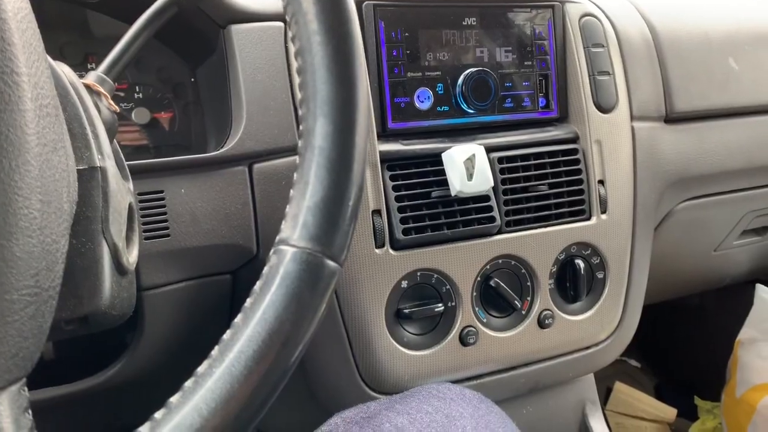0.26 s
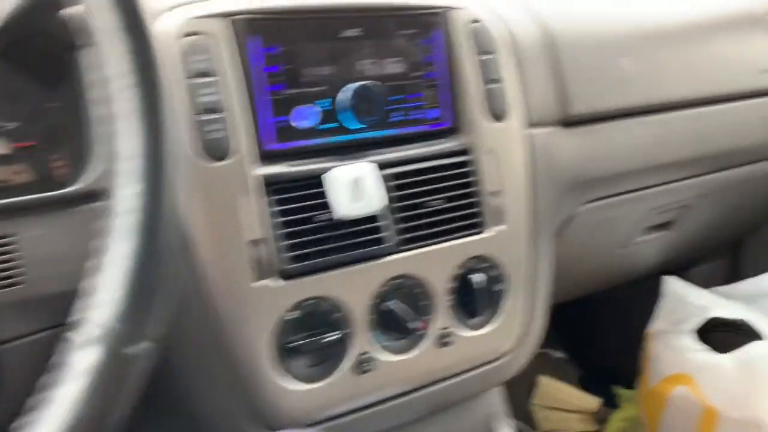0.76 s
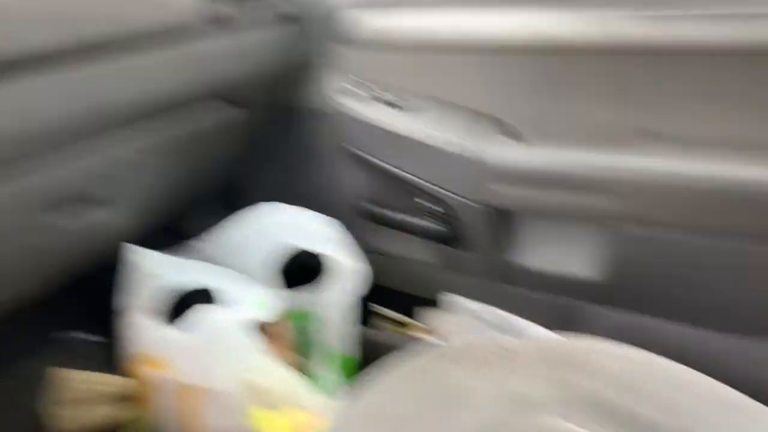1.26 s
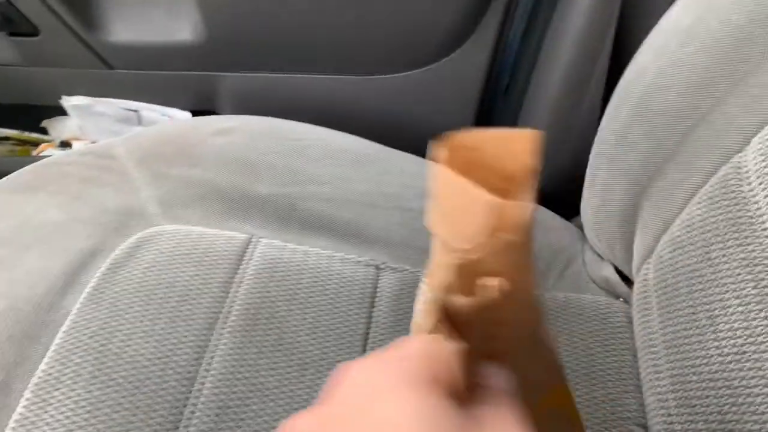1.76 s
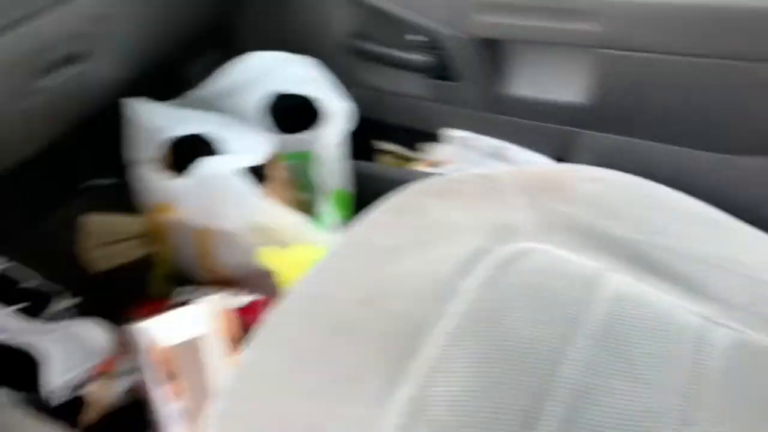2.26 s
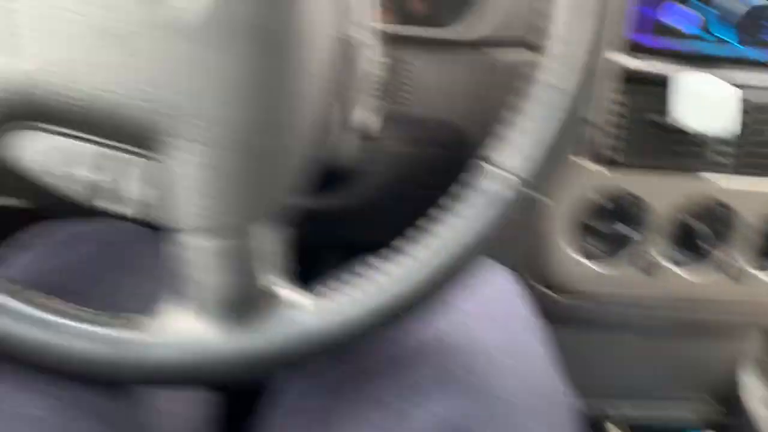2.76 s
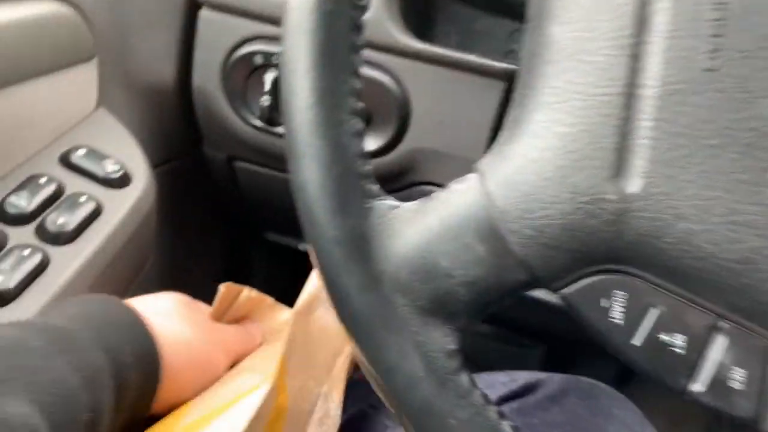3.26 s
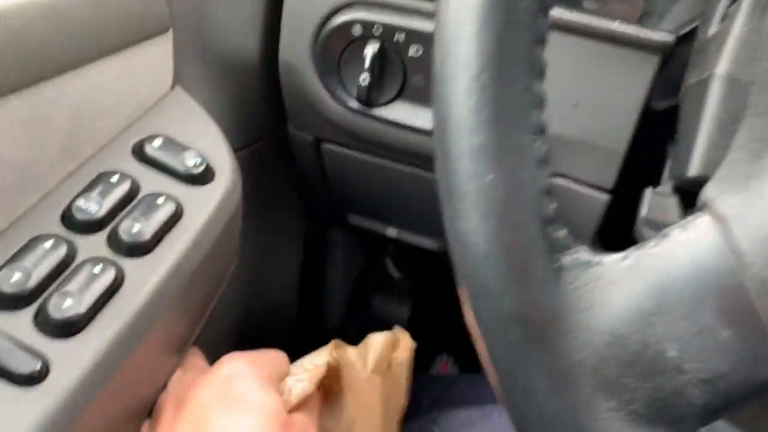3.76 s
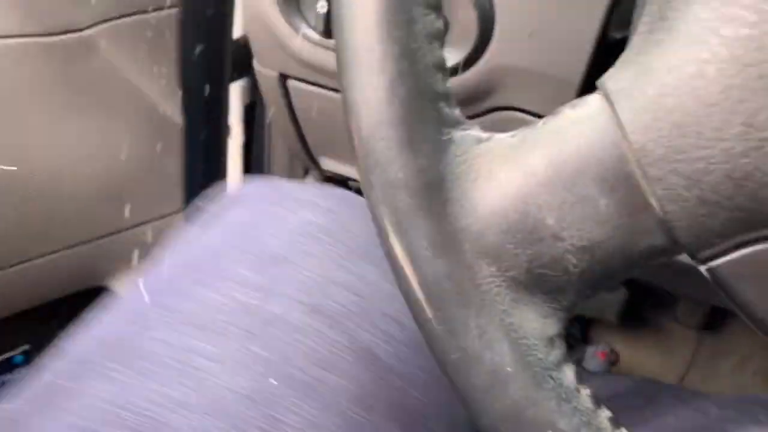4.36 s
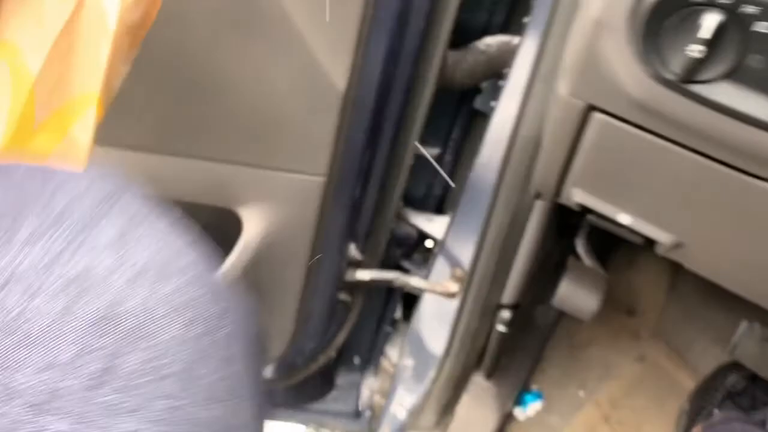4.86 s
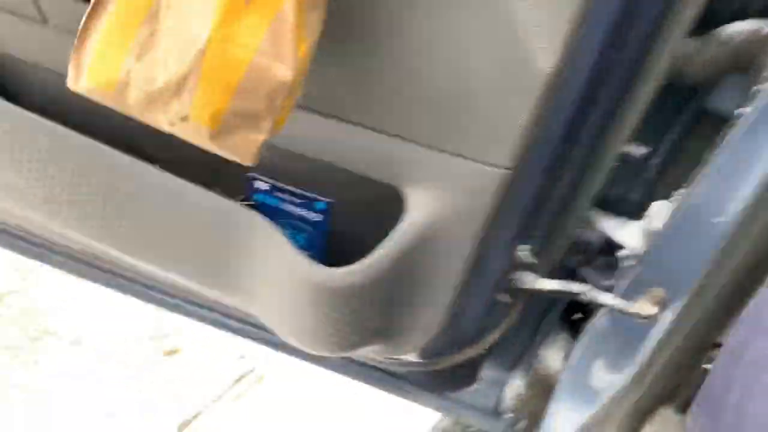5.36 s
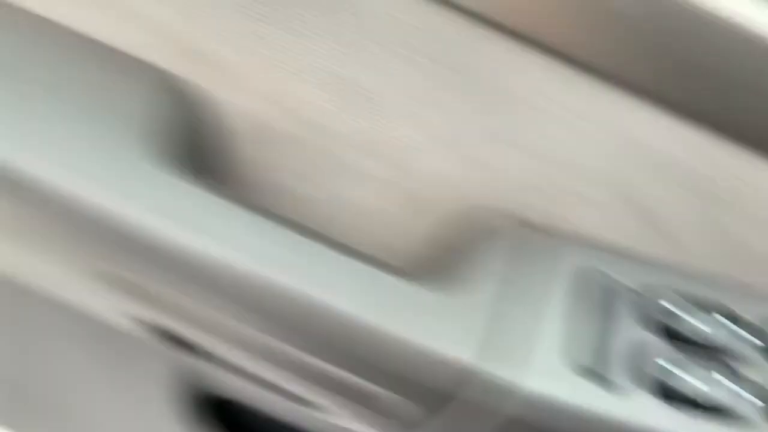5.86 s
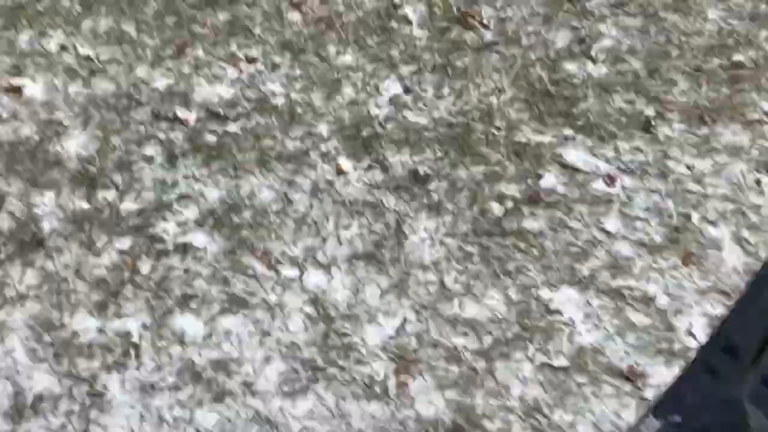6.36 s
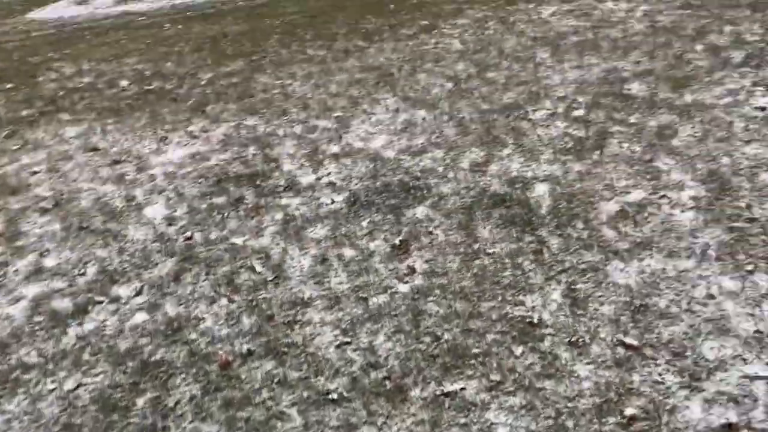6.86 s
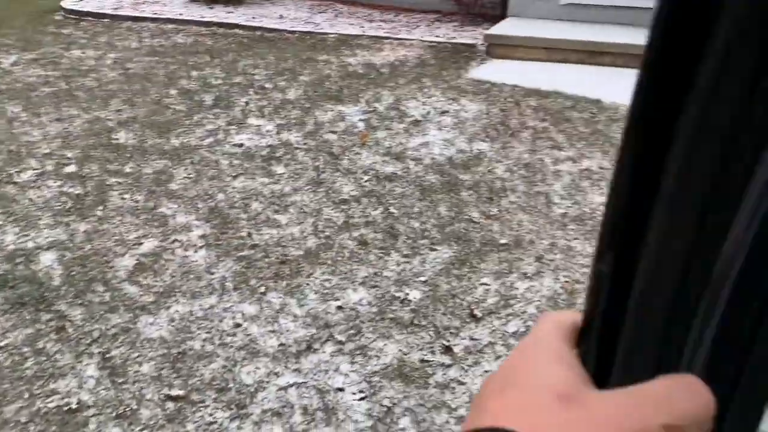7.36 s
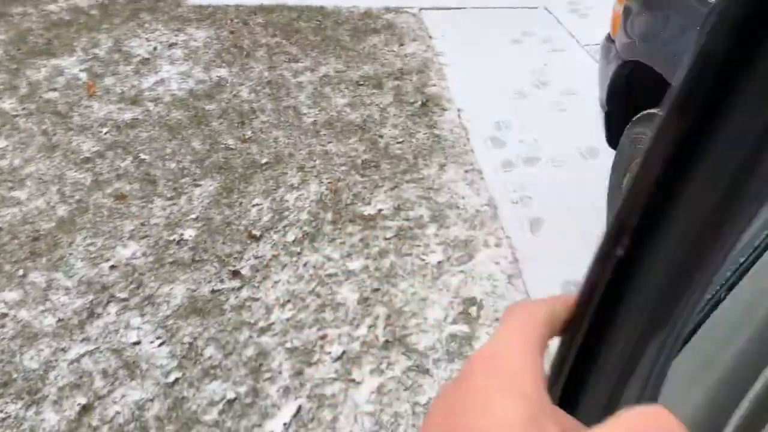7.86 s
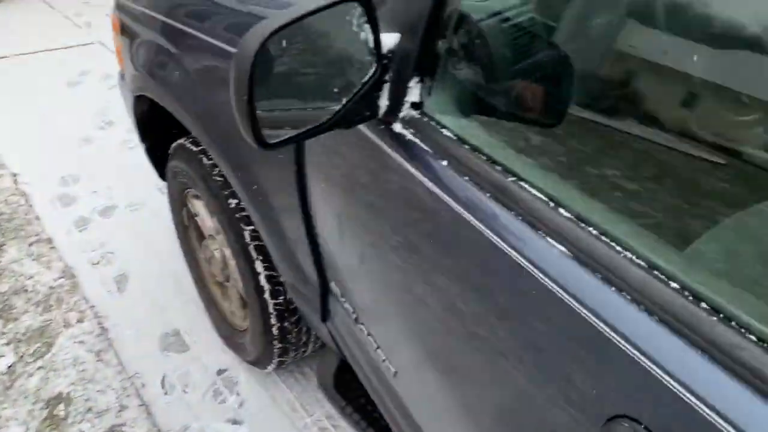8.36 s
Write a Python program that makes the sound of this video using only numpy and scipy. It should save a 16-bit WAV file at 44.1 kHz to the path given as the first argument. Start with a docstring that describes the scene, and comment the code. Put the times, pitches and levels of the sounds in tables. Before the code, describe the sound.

A stiff paper bag is grabbed, crumpled and carried out of a parked car, with cloth scuffs, dull thumps and handling rumble.

```python
"""A faint low rumble is heard first, then soft scuffs of cloth, then a paper bag that slides, crackles and snaps.
Someone in a parked car grabs the bag from the seat, climbs out and carries it round the open door.
The paper is filtered noise gated by tiny clicks, with ringing bursts for the creases, close to a hand-held
phone between its front and its left. Clothes scuff as band-passed noise, bumps are damped sines,
and handling and moving air rumble as low noise; short echoes and a faint wash of open air surround them."""
import sys
import numpy as np
from scipy import signal
from scipy.fft import rfft, irfft, next_fast_len
from scipy.io import wavfile
from scipy.ndimage import map_coordinates

SR = 44100
rng = np.random.default_rng(int(sys.argv[2]) if len(sys.argv) > 2 else 0)


def transcribe(signal):
    """Save signal, clipped to [-1, 1], as a 16-bit WAV file at the path in sys.argv[1]."""
    frames = np.atleast_2d(signal).T
    limited = np.clip(frames, -1, 1)
    pcm = np.round(limited * 32767).astype(np.int16)
    wavfile.write(sys.argv[1], SR, pcm)


N = 380122
TIME = np.arange(N) / SR

# Steady sliding of paper and clothes: reaching over, lifting the bag, waiting at the door, carrying it out.
# Each row: time in seconds, level in dB.
SLIDING_LEVEL = [(0.58, -80.5), (0.72, -73.5), (1.56, -66.5), (1.58, -42.5), (2.25, -40.5), (2.62, -50),
                 (2.72, -33), (2.86, -39.5), (3.1, -30.5), (3.9, -36.5), (4.2, -37.5), (4.88, -60.5),
                 (5.3, -43.5), (5.66, -41), (6.27, -31.5), (6.4, -50.5), (6.8, -43.5), (7.08, -58),
                 (7.65, -46.5), (7.88, -64), (8.45, -74.5), (8.51, -51)]
# Grips, squeezes and swings of the bag against something.
# Each row: peak in seconds, swell in seconds, crackle level in dB, hollow rubbing level in dB.
CRUMPLES = [(1.767, 0.064, -22.5, -25), (2.19, 0.04, -30, -26.5), (2.439, 0.032, -27, -54),
            (2.93, .03, -22, -22.5), (3.018, 0.048, -23, -22.5), (3.718, 0.079, -29.5, -29.5),
            (3.842, 0.039, -20.5, -23.5), (3.933, 0.024, -24.5, -20), (4.419, .035, -42.5, -52),
            (4.621, 0.066, -46.5, -70), (5.32, 0.085, -47.5, -26.5), (5.85, 0.068, -22.5, -26.5),
            (6.0, 0.047, -20.5, -19.5), (6.53, 0.087, -31.5, -72), (7.785, .02, -40, -55),
            (7.374, .035, -31, -37.5), (8.234, .07, -36, -29)]
# Creases that snap loudest or stand alone, in order of time.
# Each row: start in seconds, level in dB, treble against middle in dB, note of the paper panel in Hz.
CREASE_SNAPS = [(0.798, -36, -5, 1062), (1.681, -13, 7, 2420), (1.782, -10, 7, 4084),
                (1.804, -9.5, 1, 3500), (1.886, -10, -1, 252), (1.919, -17, 9, 1340),
                (1.957, -24.5, -9, 280), (2.005, -21, 1, 680), (2.037, -16, -5, 272),
                (2.109, -22, -14, 337), (2.123, -20.5, 4, 2000), (2.152, -14, 7, 2650),
                (2.178, -15.5, -11, 770), (2.285, -15.5, 3, 3800), (2.337, -18, -6, 2550),
                (2.348, -18.5, -2, 2040), (2.379, -23, -5, 2130), (2.437, -12, 8, 2060),
                (2.589, -25.5, -4, 4100), (2.798, -20.5, 0, 2720), (2.893, -17, -8, 4130),
                (2.916, -10.5, 6, 2850), (3.016, -10.5, 2, 1690), (3.072, -14.5, 2, 1300),
                (3.138, -25, -6, 1130), (3.176, -17, 3, 3930), (3.208, -19.5, 6, 4240),
                (3.246, -20, 4, 3900), (3.309, -17.5, 9, 3950), (3.404, -16.5, -1, 990),
                (3.506, -21.5, 15, 1490), (3.72, -16.5, 8, 790), (3.841, -13.5, 21, 1200),
                (3.872, -11.5, 13, 1316), (4.092, -20, 7, 810), (4.109, -18.5, 8, 6840),
                (4.432, -21, 5, 2300), (4.702, -32.0, 10.5, 2930), (5.118, -35.5, -7, 2400),
                (5.213, -27, -7, 1360), (5.6, -19, 9, 4400), (5.684, -21, 5, 1270), (5.703, -19, 4, 1880),
                (5.776, -13.5, 0.5, 1960), (5.79, -15.5, 32, 5590), (5.849, -12.5, -2, 4050),
                (5.879, -10.5, 5, 4130), (5.976, -9.5, 2, 4640), (6.014, -13.5, 15, 3450),
                (6.048, -12, 3, 1310), (6.15, -14, 0, 4870), (6.178, -17, 1, 1930), (6.219, -18, 2, 2860),
                (6.228, -15.5, 2.5, 2210), (6.255, -17, -7, 1900), (6.323, -12, -6.5, 2700),
                (6.435, -22, -3, 4200), (6.476, -22, -16, 2000), (6.556, -24.5, -13, 4250),
                (6.633, -20.5, -4, 3100), (6.655, -13.5, -11, 3000), (6.737, -18, 0, 2550),
                (6.748, -22.5, 1, 6940), (6.779, -25.5, -44, 3700), (6.798, -30.5, 1, 3100),
                (6.817, -32.5, -10, 1950), (6.896, -26, -16, 2690), (6.904, -33, -18, 2430),
                (6.988, -32.5, -5, 2100), (7.042, -31.5, -13, 1310), (7.067, -29.5, -15, 1480),
                (7.163, -24, -1, 3680), (7.251, -28.5, -5, 1520), (7.301, -24.5, -10, 2700),
                (7.342, -27, 9, 2620), (7.376, -20.5, 2, 3340), (7.383, -23.5, -3, 1450),
                (7.406, -21, 11, 2110), (7.439, -22.5, -7, 3020), (7.5, -29.5, 10, 3400),
                (7.579, -17.5, 8.5, 3200), (7.678, -25.5, 3, 3230), (7.719, -29, 3, 6500),
                (7.909, -25, 1.5, 3600), (7.99, -17, 1, 2900), (8.026, -28, 5, 2400),
                (8.089, -35.5, 2, 3420), (8.13, -20.5, 7, 1960), (8.183, -30, -2.5, 1100),
                (8.267, -19.5, -22, 300), (8.31, -16, -1.5, 4200), (8.34, -25.5, 5, 800),
                (8.355, -24.5, 0.5, 2480)]
# Where the bag is. Each row: time in seconds, lead of the left microphone in ms.
BEARING = [(2.0, 0.11), (2.25, 0.48), (3.7, 0.094), (4.4, 0.32), (5.9, 0.347), (6.8, 0.041)]
# Scuffs of clothes, seat and shoes, and the long swish of a sleeve.
# Each row: start in seconds, level before its envelope in dB, centre in Hz, decay in seconds.
SCUFFS = [(.61, -52, 880, .008), (0.621, -65.5, 3580, 0.51), (0.652, -47.5, 1180, 0.0083),
          (.68, -44.5, 398, 0.022), (0.849, -45, 1810, 0.0075), (1.186, -40.5, 970, 0.025),
          (1.195, -32, 165, 0.024), (3.63, -22.5, 1250, 0.14), (3.934, -14.5, 187, 0.055),
          (4.385, -19.5, 169, 0.032), (4.553, -27.5, 450, 0.0074), (5.03, -25.5, 580, 0.017),
          (5.275, -23, 260, 0.07), (8.18, -16.5, 280, 0.026), (8.601, -16.5, 980, 0.015)]
# Dull bumps against the phone and the door.
# Each row: start in seconds, level before its envelope in dB, pitch in Hz, decay in seconds.
BUMPS = [(0.666, -25, 86.5, 0.0031), (0.694, -25.5, 210, 0.0023), (2.039, -18.5, 198, 0.0097),
         (2.135, -16, 176, 0.0071), (3.924, -1.5, 51.4, 0.011), (3.976, -11, 70, .008),
         (4.098, -11, 42, 0.018), (4.241, -15.5, 90, 0.043), (4.326, -3, 173, 0.002),
         (4.346, -0.5, 300, 0.0017), (4.35, -13, 52, 0.028), (4.394, -14, 85.4, 0.024),
         (4.859, -26.5, 755, 0.0017), (5.135, -17, 52.6, 0.017), (5.858, -0.5, 75.5, 0.0063),
         (5.991, 2.5, 172, 0.0016), (8.209, -14, 174, 0.0062), (8.236, -12, 318, 0.003)]
# Handling and air on the phone, growing as the body starts to move.
# Each row: time in seconds, relative level in dB.
SWAY = [(0.0, -56), (1.3, -47.5), (1.8, -44), (2.7, -48.5), (3.0, -35), (3.75, -32), (4.3, -25),
        (4.55, -30), (5.0, -31.5), (5.33, -25), (5.6, -37.5), (6.15, -31.5), (6.95, -39.5), (7.12, -33.5),
        (8.62, -29.5)]
# Shifts of weight that jolt the phone. Each row: peak in seconds, swell in seconds, relative level in dB.
LURCHES = [(3.02, 0.05, -24), (3.94, 0.1, -24.5), (4.41, 0.1, -23.5), (5.91, 0.095, -13.5),
           (8.26, 0.063, -16)]
# Spectrum of the crackling paper. Each row: frequency in Hz, gain in dB.
CRACKLE_COLOUR = [(500, -8.5), (1200, -4), (2000, 1.5), (3000, -4), (4300, 0.5), (6000, -8.5), (8500, -5),
                  (11500, -7), (15500, -15.5)]
# Spectrum of the hollow bag walls. Each row: frequency in Hz, gain in dB.
WALL_COLOUR = [(70, -4), (170, -0.5), (300, 1), (430, -1.5), (540, -4), (750, -3.5), (1300, -4.5),
               (2200, -17.5), (5000, -37)]
# Spectrum of a snapping crease. Each row: frequency in Hz, gain in dB.
SNAP_COLOUR = [(100, 12.5), (300, 6.5), (700, 7), (1400, 6.5), (2500, 4), (4200, 5), (6000, 0), (8500, 3.5),
               (11500, -0.5), (15500, -9.5)]
# Spectrum of the rumble. Each row: frequency in Hz, gain in dB.
RUMBLE_COLOUR = [(12, -16), (28, -4), (50, -1), (90, -2.5), (170, -12), (300, -21.5), (1000, -49.5)]
# Spectrum of the open air. Each row: frequency in Hz, gain in dB.
AIR_COLOUR = [(30, -30), (900, -13), (2500, 13), (8000, -5), (15000, -46)]

# The walls sound with the sliding: their relative level at a reference sliding level, and dB gained per dB.
HOLLOW_DB, SLIDING_REF_DB, HOLLOW_SLOPE = -32.5, -26.5, 0.5
HOLLOW_LEAD_DB = 14.5  # most that the relative wall level may exceed the sliding
CRUMPLE_RELEASE, LURCH_RELEASE = 1, 1.05  # time to relax, as a share of the swell


def rustle(slide_db=-5, wall_db=-4, jerk_db=0.5, brisk_db=-27, thinning=0.7, apart=0.85, wall_apart=0.16):
    """Friction and buckling: brisk handling gives a dense hiss of clicks, gentle handling sparse ticks."""
    crackle_level, wall_level = handling()
    activity = np.clip(undb(thinning * (crackle_level - brisk_db)), 0.1, 2)
    clicks = buckles(per_s=600 * activity, scatter_db=4.5, ring_s=0.0006)
    # until the hand reaches the bag nothing folds and the sleeve only swishes
    folding = TIME > SLIDING_LEVEL[2][0]
    sliding = undb(slide_db) ** 2 * (np.sqrt(activity) + 1 - folding)
    energy = folding * clicks + sliding
    friction = rng.standard_normal((3, N)) * undb(jerk_db * walk(110))
    drive = friction * np.sqrt(energy)
    # the walls are too heavy to follow the sharpest clicks
    push = friction * np.sqrt(np.minimum(energy, 3))
    # the bag is wide and close, so each microphone hears a somewhat different part of it
    crackle = unit(flex(colour(spread(drive, apart), CRACKLE_COLOUR)))
    walls = unit(flex(colour(spread(push, wall_apart), WALL_COLOUR)))
    return crackle * undb(crackle_level) + walls * undb(wall_level + wall_db)


def handling():
    """Power addition: relative dB of the crackle and of the hollow walls, steady sliding plus each crumple."""
    sliding, = curves(SLIDING_LEVEL)
    hollow = HOLLOW_DB + HOLLOW_SLOPE * (sliding - SLIDING_REF_DB)
    hollow = np.minimum(hollow, sliding + HOLLOW_LEAD_DB)
    # before the arm moves the walls get no lead over the sliding
    hollow = np.where(TIME > SLIDING_LEVEL[0][0], hollow, sliding)
    s, swell_s, crackle_db, hollow_db = np.transpose(CRUMPLES)
    crackle_level = together(sliding, zip(s, swell_s, crackle_db), CRUMPLE_RELEASE)
    wall_level = together(hollow, zip(s, swell_s, hollow_db), CRUMPLE_RELEASE)
    return crackle_level, wall_level


def buckles(per_s, scatter_db, ring_s):
    """Random impulses: energy of tiny buckling clicks, most weak and a few strong, dying quickly; mean 1."""
    happens = rng.random(N) < per_s / SR
    size = undb(scatter_db * np.minimum(rng.exponential(size=N), 4)) * happens
    fade = np.exp(-2 / (ring_s * SR))
    energy = signal.filtfilt([1 - fade], [1, -fade], size ** 2 / per_s + 1e-12)
    return np.abs(energy) / np.mean(energy)


def flex(x, shift_s=0.005, per_s=14):
    """Varying delay: the paper bends all the time, so its resonances slide up and down."""
    where = np.arange(N) + shift_s * SR * walk(per_s)
    return np.array([map_coordinates(row, [where], order=3, mode="mirror") for row in x])


def snaps(ring_s=0.0012, panel_q=6, panel_gain=2.14, overtone_gain=0.36, bass_share=0.12, apart=0.8):
    """Impulsive excitation: a crease gives way in a noise burst and rings the paper panel beside it."""
    out = np.zeros((2, N))
    lead_s, burst_s, rise_s = 0.012, 0.0035, 0.0008
    beside_db, beside_s = -10, 0.0025
    t = np.arange(2048) / SR - lead_s
    for s, db, treble_db, panel_hz in list(CREASE_SNAPS) + stray_creases():
        # quiet creases give way faster than loud ones
        stretch = np.clip(2 ** ((db + 21) / 10), 0.7, 1.9) * np.exp(0.15 * rng.standard_normal())
        core = np.exp(np.minimum(t / rise_s, -t / ring_s) / stretch)
        # a smaller fold gives way just before or after the main one
        offset_s = rng.uniform(-beside_s, 2 * beside_s)
        beside = np.exp(-np.abs(t - offset_s) / ring_s)
        noise = spread(rng.standard_normal((3, len(t))), apart)
        burst = (core + undb(beside_db) * beside) * noise
        f = freqs(burst)
        overtone_hz = panel_hz * 2 ** rng.uniform(0, 1.87, 3)
        overtones = sum(resonance(f, hz, 2 * panel_q) for hz in overtone_hz)
        panel = 1 + panel_gain * resonance(f, panel_hz, panel_q) + overtone_gain * overtones
        # a panel radiates little far below its own note
        panel = panel * f / (f - 1j * bass_share * panel_hz)
        tilt = undb(treble_db * f ** 4 / (f ** 4 + 5500 ** 4))
        burst = colour(shape(burst, panel * tilt), SNAP_COLOUR)
        loudness = np.sqrt(np.sum(burst ** 2) / (2 * burst_s * SR))
        add(out, s - lead_s, undb(db) * burst / loudness)
    return out


def stray_creases(above_db=6, scatter_db=0.5, treble_db=3, treble_scatter_db=8, panel_hz=2300, count=100):
    """Random yielding: lesser creases come more often, louder and brighter with effort; rows like CREASE_SNAPS."""
    usual_db, crowding, growth, brightening = -30, 0.4, 0.72, 0.7
    effort_db = handling()[0] - usual_db
    touched = TIME > SLIDING_LEVEL[3][0]
    worked = np.cumsum(undb(crowding * effort_db) * touched)
    # one crease at random within each equal share of the work
    share = (np.arange(count) + rng.random(count)) / count
    when = np.searchsorted(worked, worked[-1] * share).clip(0, N - 1)
    size, treble, panel = rng.standard_normal((count, 3)).T
    level = usual_db + above_db + growth * effort_db[when] + scatter_db * size
    brightness = treble_db + brightening * effort_db[when] + treble_scatter_db * treble
    return list(zip(TIME[when], level, brightness, panel_hz * np.exp(0.5 * panel)))


def scuffs(q=1.38, rise_share=0.45):
    """Band-passed friction: soft rubs of cloth and soles; the low ones are body and hand on seat and door."""
    out = np.zeros(N)
    t = np.arange(65536) / SR
    for s, db, hz, decay_s in SCUFFS:
        noise = rng.standard_normal(len(t))
        f = freqs(noise)
        rub = unit(shape(noise, resonance(f, hz, q) * resonance(f, hz, q / 2)))
        envelope = (1 - np.exp(-t / (rise_share * decay_s))) * np.exp(-t / decay_s)
        add(out, s, undb(db) * rub * envelope)
    return out


def bumps():
    """Damped oscillation: each bump is a swing of pressure that dies away exponentially."""
    out = np.zeros(N)
    t = np.arange(8192) / SR
    for s, db, hz, decay_s in BUMPS:
        envelope = (1 - np.exp(-8 * hz * t)) * np.exp(-t / decay_s)
        add(out, s, undb(db) * np.sin(2 * np.pi * hz * t) * envelope)
    return out


def reflections(x, t60_s=0.087, inside_db=-9.0, count=24):
    """Exponential decay: seats, glass and door return a short echo, varied as the phone moves, weaker outside."""
    leave_s, outside_db = 6.1, -17
    t = np.arange(4096) / SR
    x = x * undb(np.interp(TIME, [leave_s - 0.5, leave_s + 0.5], [inside_db, outside_db]))
    out, hop = np.zeros((2, N)), N // count
    for start in range(0, N - hop, hop):
        echo = rng.standard_normal((2, len(t))) * np.exp(-np.log(1000) * t / t60_s)
        echo = colour(echo, [(300, 2), (1200, 6), (15000, 0)]) / np.sqrt(np.sum(echo ** 2) / 2)
        # overlapping sine windows pass smoothly from one echo to the next
        part = x[start:start + 2 * hop]
        part = part * np.sin(np.pi * np.arange(len(part)) / (2 * hop))
        add(out, start / SR, signal.fftconvolve(part[None], echo, axes=1))
    return out


def rumble(rumble_db=-4.0, deep_hz=110, brisk_db=-28, brightening=0.28, calming=0.26):
    """Low-frequency turbulence: uneven buffeting, nearly alike on both microphones, duller when weaker."""
    sway, = curves(SWAY)
    level = together(sway, LURCHES, LURCH_RELEASE)
    noise = spread(unit(colour(rng.standard_normal((3, N)), RUMBLE_COLOUR)), apart=0.3)
    deep = signal.sosfiltfilt(signal.butter(2, deep_hz, fs=SR, output="sos"), noise)
    noise = deep + (noise - deep) * undb(brightening * np.minimum(level - brisk_db, 0))
    # a phone held still rumbles more evenly
    unrest = np.clip(undb(calming * (level - brisk_db)), 0, 1)
    buffet_db, per_s, limit = 3.5, 22, 1.5
    buffeting = buffet_db * unrest * np.minimum(walk(per_s), limit)
    return noise * undb(level + rumble_db + buffeting)


def outdoors(air_db=-68, door_s=3.5, opening_s=0.57):
    """Diffuse noise: a faint wash of open air comes in as the car door opens."""
    air = spread(unit(colour(rng.standard_normal((3, N)), AIR_COLOUR)), apart=1.0)
    opening = np.clip((TIME - door_s) / opening_s, 0, 1)
    return air * undb(air_db + walk(1)) * opening


def swell(peak_s, swell_s, release, roundness=1.26):
    """Rise and relaxation: the envelope of one movement builds to 1 at its peak and falls again."""
    t = (TIME - peak_s) / swell_s
    return np.exp(-np.minimum(np.maximum(-t, t / release), 30) ** roundness)


def together(bed_db, movements, release):
    """Incoherent addition: dB of a steady bed plus movements of (peak s, swell s, dB), their powers summed."""
    power = undb(bed_db) ** 2
    for s, swell_s, db in movements:
        power = power + (undb(db) * swell(s, swell_s, release)) ** 2
    return 10 * np.log10(power)


def undb(db):
    """Logarithmic level: decibels to amplitude gain."""
    return 10 ** (np.asarray(db) / 20)


def unit(x):
    """Normalisation: scale to rms 1."""
    return x / np.sqrt(np.mean(x ** 2))


def curves(table):
    """Linear interpolation: each column of a table of (s, ..) rows, at every sample."""
    times, *columns = np.transpose(table)
    return [np.interp(TIME, times, column) for column in columns]


def freqs(x):
    """Fourier analysis: frequencies in Hz of the spectrum of x, kept above zero."""
    return np.maximum(np.fft.rfftfreq(x.shape[-1], 1 / SR), 1)


def shape(x, gain):
    """Linear filtering: multiply the spectrum by a gain at each frequency."""
    return irfft(rfft(x) * gain, x.shape[-1])


def colour(x, points):
    """Spectral shaping: filter by (Hz, dB) points joined on a logarithmic frequency axis."""
    hz, db = np.transpose(points)
    length = x.shape[-1]
    padding = [(0, 0)] * (x.ndim - 1) + [(0, next_fast_len(length, True) - length)]
    padded = np.pad(x, padding)
    gain = undb(np.interp(np.log(freqs(padded)), np.log(hz), db))
    return shape(padded, gain)[..., :length]


def resonance(f, hz, q):
    """Resonance: complex response of one band-pass oscillator."""
    return 1 / (1 + 1j * q * (f / hz - hz / f))


def walk(rate):
    """Random modulation: straight lines between random points, rate per second, with a spread near 1."""
    steps = rng.standard_normal(N // 50)
    return 1.07 * np.interp(TIME * rate, np.arange(len(steps)), steps)


def add(out, s, sound):
    """Superposition: mix a sound in at time s."""
    start = int(s * SR)
    out[..., start:start + sound.shape[-1]] += sound[..., :N - start]


def spread(x, apart):
    """Partial coherence: three unrelated rows become a stereo pair, one shared and one for each side."""
    return (x[0] + apart * x[1:]) / np.sqrt(1 + apart ** 2)


def scene():
    """Arrival-time difference: the bag reaches the right side after the left; rubs and bumps reach both at once."""
    left, right = rustle() + snaps()
    rubs = scuffs()
    lead_ms, = curves(BEARING)
    right = map_coordinates(right, [np.arange(N) - lead_ms * SR / 1000], order=3)
    close = np.array([left, right]) + rubs
    return close + reflections(left + rubs) + rumble() + bumps() + outdoors()


def record(dry, kept=0.11):
    """Band splitting: the phone feeds most of the right treble to both channels, later on the left; top cut."""
    split_hz, lag_s, top_hz = 6500, 0.000141, 15900
    padded = np.pad(dry, [(0, 0), (0, next_fast_len(N, True) - N)])
    f, (left, right) = freqs(padded[0]), rfft(padded)
    # share of power that the left channel keeps of its own
    own = 1 / (1 + (f / split_hz) ** 16)
    own = np.maximum(own, kept ** 2)
    delayed = right * np.exp(-2j * np.pi * f * lag_s)
    left = np.sqrt(own) * left + np.sqrt(1 - own) * delayed
    sound = irfft(np.array([left, right]), padded.shape[-1])[:, :N]
    sound = np.clip(sound, -1, 1)  # overload
    return signal.sosfilt(signal.ellip(10, 0.2, 80, top_hz, fs=SR, output="sos"), sound)


dry = scene()
out = record(dry)
transcribe(out)
```